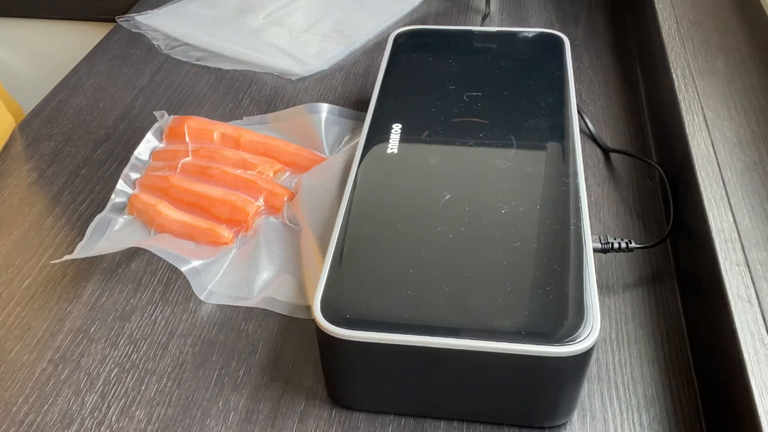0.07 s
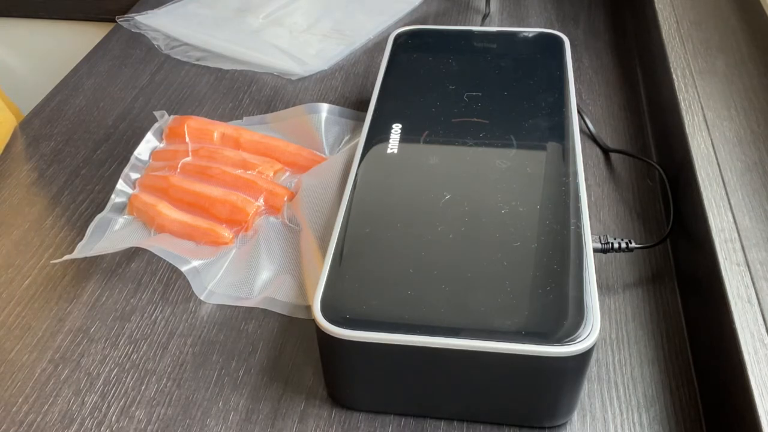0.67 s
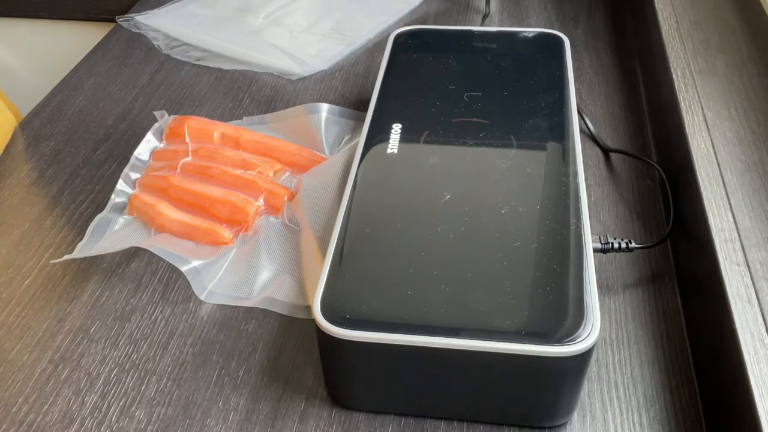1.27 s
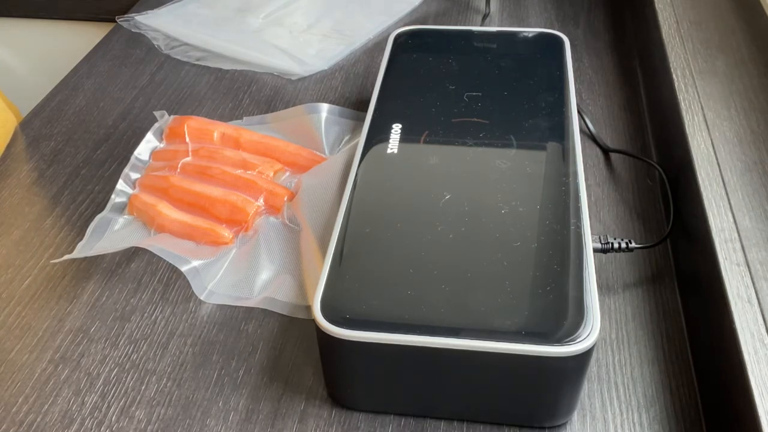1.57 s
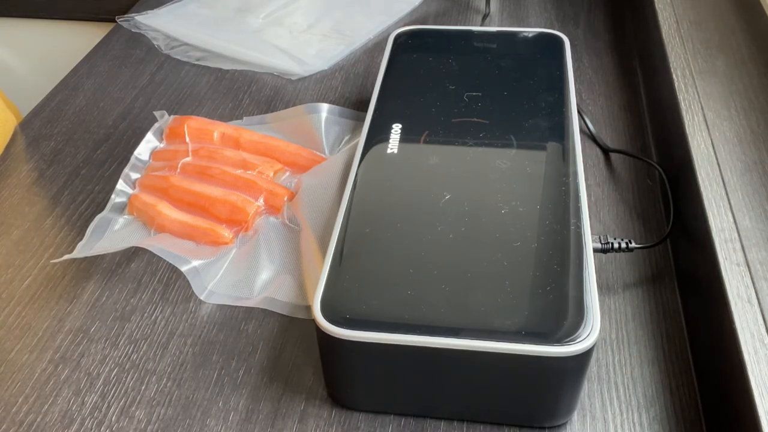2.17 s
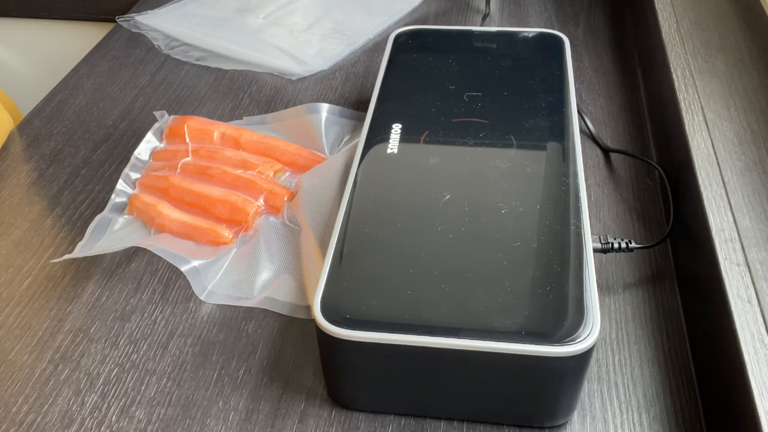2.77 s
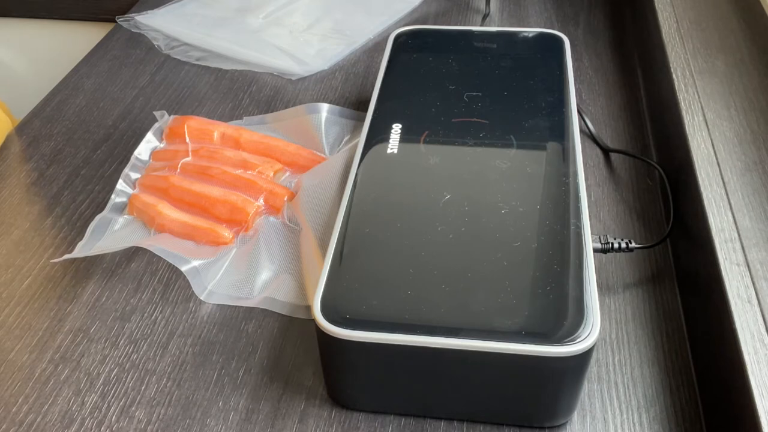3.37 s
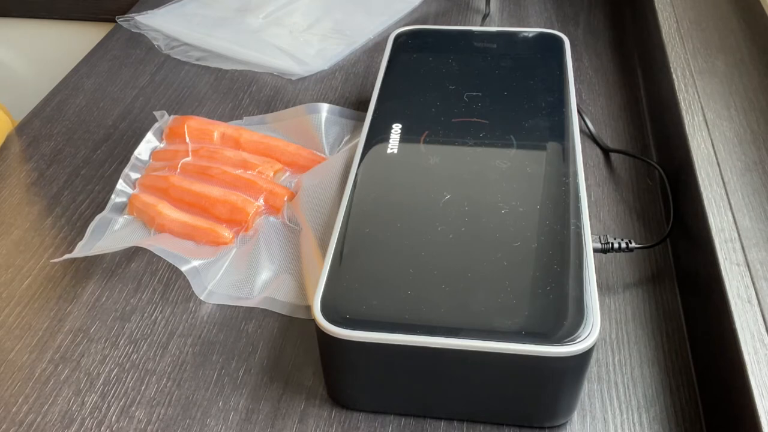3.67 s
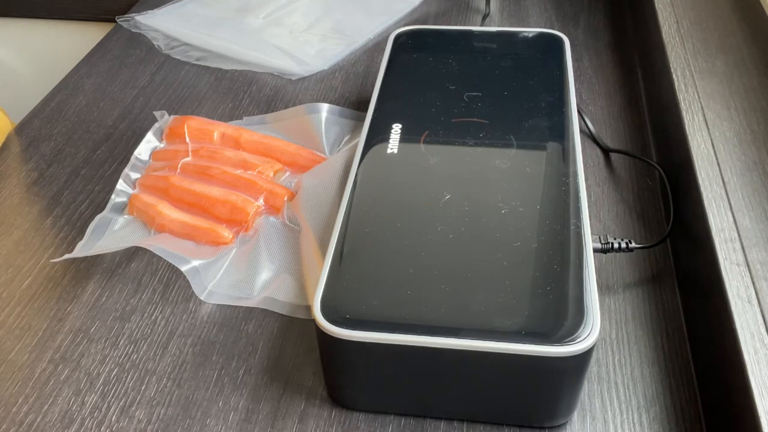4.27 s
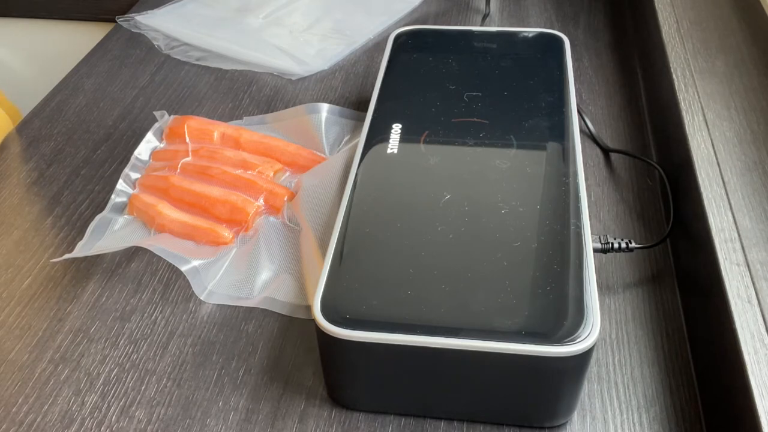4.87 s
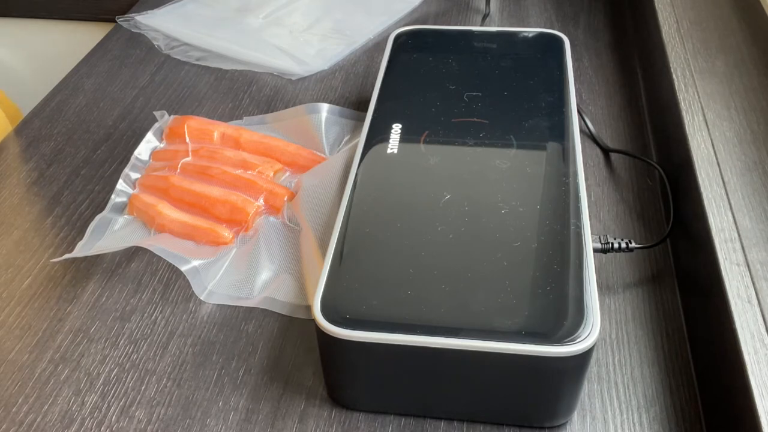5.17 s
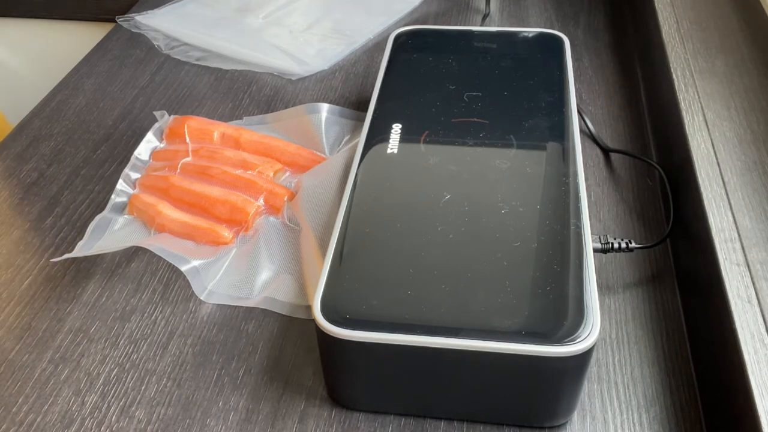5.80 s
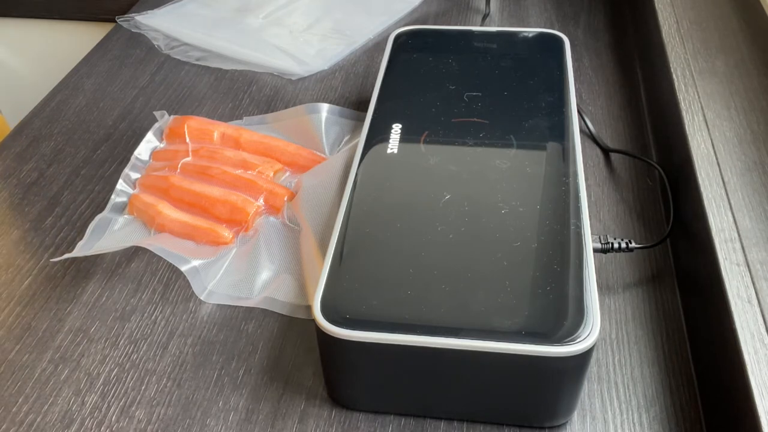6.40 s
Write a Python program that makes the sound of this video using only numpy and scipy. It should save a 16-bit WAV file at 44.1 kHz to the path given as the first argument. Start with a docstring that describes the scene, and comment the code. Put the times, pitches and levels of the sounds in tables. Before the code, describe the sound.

A vacuum sealer's small pump buzzes loudly close to the microphone for an instant, then switches off and winds down with a falling clatter and a short rattle. A quiet room remains, with low rumble and faint hiss. The plastic food bag rustles faintly as it settles, a few soft bumps sound on the wooden counter, and small ticks, tiny squeaks and a quick snap come later.

```python
"""A vacuum sealer finishes a bag

A vacuum sealer on a wooden counter pulls the last air from a food bag. Its diaphragm pump buzzes
under load, is switched off and coasts to rest with clattering valves, puffs of air and a last rattle.
Then the quiet room rumbles and hisses. Soft blows ring the counter, the plastic ticks and snaps,
and the bag rustles and squeaks as it settles."""
import sys
import numpy as np
from scipy import signal
from scipy.fft import rfft, irfft
from scipy.io import wavfile
from scipy.ndimage import uniform_filter1d

SR = 44100
rng = np.random.default_rng(int(sys.argv[2]) if len(sys.argv) > 2 else 0)


def generate_wav(sig):
    """Save sig (samples, or channels by samples) to the path in sys.argv[1] as 16-bit PCM at SR."""
    pcm = np.round(np.clip(np.atleast_2d(sig).T, -1, 1) * 32767).astype(np.int16)
    wavfile.write(sys.argv[1], SR, pcm)


N = 288414
TIME = np.arange(N) / SR


def from_db(db):
    """Turn decibels into a number to multiply by."""
    return 10 ** (np.asarray(db) / 20)


def rms_one(x):
    """Scale a sound so that its average power is 1."""
    return x / np.sqrt(np.mean(x ** 2) + 1e-20)


def cut(x, hz, order, keep="low"):
    """Keep the low or the high side of a sound; a higher order cuts more steeply."""
    return signal.sosfilt(signal.butter(order, hz, keep, fs=SR, output="sos"), x + 1e-18)


def db_at(colour, hz):
    """Read a level between the rows of a colour table, which says how strong each frequency is."""
    known_hz, db = np.transpose(colour)
    return np.interp(np.log(hz), np.log(known_hz), db)


def noise(colour):
    """Steady noise of power 1 in the given colour, falling steeply past both ends of the table."""
    hz = np.maximum(np.fft.rfftfreq(N, 1 / SR), 1)
    octaves_outside = np.abs(np.log2(hz / np.clip(hz, colour[0][0], colour[-1][0])))
    gain = from_db(db_at(colour, hz) - 74 * octaves_outside)
    return rms_one(irfft(rfft(rng.standard_normal(N)) * gain, N))


def resonate(x, hz, width_hz):
    """A resonance: it lets through the sound near one frequency."""
    r = np.exp(-np.pi * width_hz / SR)
    feedback = [1, -2 * r * np.cos(2 * np.pi * hz / SR), r * r]
    return signal.lfilter(np.array([1, 0, -1]) * (1 - r * r) / 2, feedback, x + 1e-18)


def ring(clicks, hz, fade_s):
    """Each click starts a tone that drops 60 dB in fade_s."""
    r, w = np.exp(-np.log(1000) / (fade_s * SR)), 2 * np.pi * hz / SR
    return signal.lfilter([0, np.sin(w)], [1, -2 * r * np.cos(w), r * r], clicks + 1e-18)


def since(start_s):
    """Seconds since the start, and 0 before it."""
    return np.maximum(TIME - start_s, 0)


def dying(start_s, fade_s):
    """Jump to 1, then die away. A fade time is the time it takes to drop 60 dB."""
    return (TIME >= start_s) * np.exp(-np.log(1000) * since(start_s) / fade_s)


def ramp(start_s, length_s):
    """Rise evenly from 0 to 1."""
    return np.clip((TIME - start_s) / length_s, 0, 1)


def drift(per_s):
    """Wander at random, mostly between -1 and 1."""
    points = rng.standard_normal(int(N / SR * per_s) + 2)
    return np.interp(TIME * per_s, np.arange(len(points)), points)


def room(x, echo_db, wall_hz=5000):
    """Add a smooth wash of echoes, dulled by the walls."""
    tail = (rng.standard_normal(N) * dying(start_s=0.0033, fade_s=0.4))[:SR]
    tail = cut(tail / np.linalg.norm(tail), wall_hz, order=1)
    return x + from_db(echo_db) * signal.fftconvolve(x, tail)[:N]


FULL_TURNS_PER_S, SWITCH_OFF_S = 196.9, 0.145


def motor_speed(drag_s=1.0, stop_s=0.585):
    """Share of full speed: steady until switched off, then slowed by drag until friction stalls it."""
    coast_s = stop_s - SWITCH_OFF_S
    coasted_s = np.minimum(since(SWITCH_OFF_S), coast_s)
    return np.maximum(1 - np.expm1(-coasted_s / drag_s) / np.expm1(-coast_s / drag_s), 0)


def pump_load(hold_s=0.019, release_s=0.025):
    """Share of full load, which lets go just after the switch."""
    return np.exp(-(since(SWITCH_OFF_S + hold_s) / release_s) ** 2)


def motor_tones(turns, rows):
    """Tones at whole multiples of the turning speed, made for the first second only."""
    out, angle = np.zeros(N), 2 * np.pi * turns[:SR]
    for multiple, db in rows:
        phase = rng.uniform(0, 2 * np.pi)
        out[:SR] += np.sqrt(2) * from_db(db) * np.sin(multiple * angle + phase)
    return out


# The tones that stand out of the buzz. Each row: multiple of the motor speed, relative level in dB.
BUZZ_TONES = [(1, -1), (2, -47.5), (3, -21.5), (4, -18), (5, -29), (6, -31.5), (7, -33.5), (9, -39),
              (12, -39), (17, -46), (19, -45.5), (20, -47), (29, -44), (39, -48), (42, -49)]
# The colours of the other buzz tones, the valve clatter and the rushing air.
# Each row: frequency in Hz, relative level in dB.
BUZZ_COLOUR = [(1600, -44), (2200, -42), (2600, -48), (3100, -44), (4300, -57), (5900, -53), (6700, -60.5),
               (7600, -55.5), (9500, -57), (10000, -75), (14000, -63)]
VALVE_COLOUR = [(130, 10), (220, 0), (330, 7), (400, -11), (560, 2), (800, -3), (1300, -3), (1900, -9.5),
                (2800, -10.5), (4200, -34.5), (5000, -55), (8000, -23.5)]
AIR_COLOUR = [(2000, 11), (3000, 5.5), (4200, 1.5), (5000, -5), (6800, -5.5), (7900, -6), (9500, -7.5),
              (10500, -40), (15000, -25.5)]


def loaded_pump(turns, level_db=-14.5, valve_db=-52, air_db=-50, uneven_db=2.5, flutter_db=1.0):
    """Fast, even strokes make a hum under a fluttering whine, which goes first when the power is cut."""
    levels = {k: db_at(BUZZ_COLOUR, k * FULL_TURNS_PER_S) + rng.normal(0, uneven_db)
              for k in range(1, 77)}
    levels.update(BUZZ_TONES)
    tones = list(levels.items())
    # The high tones flutter in six separate groups.
    whine = sum(motor_tones(turns, tones[7 + group::6]) * from_db(flutter_db * drift(per_s=45))
                for group in range(6))
    hum = motor_tones(turns, tones[:3])
    middle = motor_tones(turns, tones[3:7])
    driven = np.exp(-since(SWITCH_OFF_S) / 0.019)
    buzz = hum + driven * (middle + whine)
    rush = from_db(valve_db) * noise(VALVE_COLOUR) + from_db(air_db) * noise(AIR_COLOUR)
    return from_db(level_db) * pump_load() * (buzz + rush)


# The colour of the room's rumble. Each row: frequency in Hz, relative level in dB.
RUMBLE_COLOUR = [(25, -47), (33, -28), (40, -5.5), (48, 4), (56, 2.5), (65, 7.5), (92, -14.5), (110, -4.5),
                 (127, -11.5), (152, -1.5), (175, -8.5), (225, -8), (257, -18.5), (274, -11), (295, -22),
                 (342, -17.5), (400, -37)]
# How its deep and upper parts swell. Each row: time in seconds, change of level in dB.
DEEP_SWELLS = [(0.6, 4.5), (0.75, 0.5), (1.2, -2.5), (1.6, -0.5), (2.1, 3.5), (2.4, -2), (2.6, 5),
               (2.85, 2), (3.1, 0.5), (3.7, -2.5), (4.1, 2.5), (4.95, 2.5), (5.1, 0.5), (5.35, 2),
               (5.87, -1), (6.15, 2)]
UPPER_SWELLS = [(0.6, 1.5), (1.5, 0), (2.05, 0.5), (2.35, -3.5), (2.6, -1), (3.3, -1), (4.0, 0.5),
                (4.25, -0.5), (4.6, 1), (5.1, 2), (5.85, -2), (6.1, 1.5), (6.5, -1.5)]


def rumble(level_db=-55, split_hz=95, steady_s=0.26):
    """The building rumbles in the room's low resonances; the deep and upper parts swell separately."""
    out = 0
    for side, swells in (("low", DEEP_SWELLS), ("high", UPPER_SWELLS)):
        part = cut(noise(RUMBLE_COLOUR), split_hz, order=8, keep=side)
        steady = part / np.sqrt(uniform_filter1d(part ** 2, int(steady_s * SR)) + 1e-12)
        out += steady * from_db(level_db + np.interp(TIME, *np.transpose(swells)))
    return out


# The colour of the room's hiss. Each row: frequency in Hz, relative level in dB.
HISS_COLOUR = [(380, -2), (550, -3), (950, -0.5), (1250, -3), (1650, -3), (2250, -6), (2700, -1),
               (3750, -10.5), (4200, -6), (5200, -12.5), (6100, -6), (7200, -10), (8100, -5.5),
               (9000, -15.5), (10200, -25.5), (10800, -50)]
# The ringing in that hiss. Each row: frequency in Hz, width in Hz, relative level in dB.
HISS_RESONANCES = [(477, 20, 2), (721, 16, 1), (1095, 22, -1), (1423, 18, 4), (1507, 14, 1.5),
                   (1765, 25, -6), (2058, 50, 0), (2645, 40, -6), (2950, 60, -7), (3345, 40, -5),
                   (3490, 40, -7)]


def room_hiss(hiss_db=-71, ringing_db=-74, hiss_sway_db=1.16, ringing_sway_db=2):
    """A faint hiss that the walls colour; its resonances come and go."""
    air = noise(HISS_COLOUR)
    ringing = 0
    for hz, width_hz, db in HISS_RESONANCES:
        gain = from_db(db - db_at(HISS_COLOUR, hz) + ringing_sway_db * drift(per_s=9))
        ringing += gain * resonate(air, hz, width_hz)
    hiss_gain = from_db(hiss_db + hiss_sway_db * drift(per_s=7.8))
    hiss = room(noise(HISS_COLOUR), echo_db=-10, wall_hz=12200)
    return hiss_gain * rms_one(hiss) + from_db(ringing_db) * rms_one(ringing)


def lingering_hum(level_db=-26):
    """The room holds the hum at its old pitch while the motor slows."""
    hum = motor_tones(FULL_TURNS_PER_S * TIME, [(1, level_db)])
    return hum * (1 - pump_load()) * dying(SWITCH_OFF_S, fade_s=0.71)


def stutter(speed, slip_turns=0.045):
    """The turns by which the crank runs ahead or lags by chance, more so the slower it goes."""
    return slip_turns * (1 - speed) * drift(per_s=130)


# The resonances of the plastic case. Each row: frequency in Hz, width in Hz, boost in dB.
CASE_RESONANCES = [(293, 30, 4), (458, 16, 8), (557, 15, -2), (773, 68, 1.5), (950, 27, -3.5),
                   (1105, 28, -4.5), (1150, 67, -24.5), (1410, 330, -0.5), (2550, 84, 3.5)]


def through_case(x):
    """The plastic case passes on the sound near its own resonances."""
    return sum(from_db(db) * resonate(x, hz, width_hz) for hz, width_hz, db in CASE_RESONANCES)


# The tones of the shaking pump. Each row: multiple of the motor speed, relative level in dB.
SHAKE_TONES = [(1, -1.5), (2, 1.5), (3, 6.5), (4, 0), (5, -5), (6, 5), (7, 0.5), (8, -6.5), (9, -10.5),
               (10, -12.5)]


def shake(turns, wobble_db=2.8, direct_db=-8, lost_to_rattle=0.5):
    """The pump shakes its case; its wavering tones swell as they slide through the resonances."""
    tones = [motor_tones(turns, [row]) * from_db(wobble_db * drift(per_s=35)) for row in SHAKE_TONES]
    upper = sum(tones[2:]) * (1 - lost_to_rattle * rattle_onset())
    shaking = sum(tones[:2]) + from_db(direct_db) * upper + through_case(tones[1] + upper)
    shaking /= np.linalg.norm([from_db(db) for _, db in SHAKE_TONES])
    return cut(shaking, hz=75, order=2, keep="high")   # a small case gives off little deep bass


def valve_clatter(flaps, case_db=-5):
    """The flapping valves make pulses of noise, heard directly and through the case."""
    knocks = flaps * noise(VALVE_COLOUR)
    return rms_one(knocks + from_db(case_db) * rms_one(through_case(knocks)))


def air_puffs(flaps, speed, vent_db=-49.5, hold_s=0.059, fade_s=0.25, puff_db=-61.5):
    """Trapped air escapes at the switch, and the valves puff more weakly as the pump slows."""
    vent = from_db(vent_db) * np.exp(-np.log(1000) * since(SWITCH_OFF_S + hold_s) / fade_s)
    puffs = from_db(puff_db) * speed ** 0.68
    return np.hypot(vent, puffs) * flaps * noise(AIR_COLOUR)


def coasting_pump(turns, speed, shake_db=-27, clatter_db=-40.5):
    """The freed pump shakes, clatters and puffs, rocking hardest at the resonance of its mounts."""
    mount_hz, mount_width_hz, mount_db = 152.4, 4.8, 2.5
    rocking = from_db(mount_db / (1 + ((speed * FULL_TURNS_PER_S - mount_hz) / mount_width_hz) ** 2))
    loose = ramp(SWITCH_OFF_S, length_s=0.021)
    flaps = rms_one(np.exp(0.22 * np.cos(4 * np.pi * turns)))   # the valves flap twice a turn
    shaking = from_db(shake_db) * speed ** 1.1 * loose * shake(turns)
    clatter = from_db(clatter_db) * speed ** 1.3 * (1 - pump_load()) * valve_clatter(flaps)
    return rocking * (shaking + clatter) + loose * air_puffs(flaps, speed)


def rattle_onset():
    """How far the rattle has set in, from 0 to 1."""
    return ramp(start_s=0.275, length_s=0.06)


# The colour of the rattle's knocks. Each row: frequency in Hz, relative level in dB.
RATTLE_COLOUR = [(190, 15.5), (300, 5), (420, 0.5), (600, 4.5), (850, 0.5), (1300, -3.5), (1800, -23.5),
                 (2700, -29), (4200, -27)]


def rattle(turns, level_db=-41, case_db=-6, uneven_db=2, scatter_s=0.0012, knock_s=0.0069):
    """The slow pump knocks loosely against its case twice a turn, until friction stalls it."""
    strokes = np.flatnonzero(np.diff(np.floor(2 * turns)))
    lateness, strength = rng.standard_normal((SR, 2))[:len(strokes)].T
    hits = np.abs(strokes + lateness * scatter_s * SR).astype(int)
    clicks = np.zeros(N)
    clicks[hits] = from_db(uneven_db * strength)
    bursts = signal.lfilter([1], [1, -np.exp(-1 / (knock_s * SR))], clicks + 1e-18)
    knocks = cut(bursts * noise(RATTLE_COLOUR), hz=3000, order=4)
    fading = np.exp(-since(0.415) / 0.033)   # holds, then dies quickly
    return from_db(level_db) * rattle_onset() * fading * (knocks + from_db(case_db) * through_case(knocks))


# Soft scuffs. Each row: loudest moment in seconds, level in dB.
SCUFF_SWELLS = [(1.04, -69), (1.76, -68.5), (2.02, -70), (2.63, -87), (3.28, -71), (3.69, -72), (3.95, -68),
                (4.48, -69), (5.06, -66.5)]
# Their colour. Each row: frequency in Hz, relative level in dB.
SCUFF_COLOUR = [(330, -0.5), (480, -4), (650, -5.5), (900, -21)]


def scuffs(half_s=0.021):
    """Short, dull swells of rubbing just above the rumble."""
    peak_s, db = np.transpose(SCUFF_SWELLS)
    swells = np.exp(-0.5 * ((TIME - peak_s[:, None]) / half_s) ** 2)
    return (from_db(db) @ swells) * noise(SCUFF_COLOUR)


# The bag settling.
# Each row: loudest moment in seconds, half length in seconds, rub level in dB, crinkle level in dB.
BAG_RUSTLES = [(1.677, .03, -90, -73.5), (2.178, .03, -73.5, -92), (2.985, 0.072, -73, -79),
               (3.217, 0.034, -84, -80), (3.328, 0.018, -78, -73), (3.39, 0.027, -78, -81),
               (3.506, 0.063, -74, -81), (3.666, 0.02, -70.5, -74), (4.781, 0.035, -71, -66.5),
               (5.55, 0.033, -86, -80), (5.67, 0.05, -71, -83), (6.11, 0.022, -73, -73.5),
               (6.21, 0.021, -71, -80), (6.316, 0.023, -71, -73)]
# The colours of rubbing and of crinkling film. Each row: frequency in Hz, relative level in dB.
RUB_COLOUR = [(550, 6.5), (900, -1), (1500, -2), (2100, 0.5), (3000, -3), (4000, -5.5)]
CRINKLE_COLOUR = [(2800, -7), (4500, 2), (6500, 1.5), (9000, -7), (10500, -31)]


def rustles(grain_db=3, stir_db=-83, stir_sway_db=4):
    """The bag's film rubs and crinkles in brief, grainy swells and stirs faintly in between."""
    peak_s, half_s, rub_db, crinkle_db = np.transpose(BAG_RUSTLES)
    swells = np.exp(-0.5 * ((TIME - peak_s[:, None]) / half_s[:, None]) ** 2)
    stir = from_db(stir_db + stir_sway_db * drift(per_s=14))
    grains = from_db(grain_db * drift(per_s=400))
    return sum(np.hypot(from_db(db) @ swells, stir) * rms_one(noise(colour) * grains)
               for db, colour in ((rub_db, RUB_COLOUR), (crinkle_db, CRINKLE_COLOUR)))


# Ticks of the case and bag.
# Each row: start in seconds, level in dB, middle frequency in Hz, fade time in seconds.
PLASTIC_TICKS = [(1.987, -65.5, 880, 0.26), (3.075, -67.5, 1010, 0.28), (3.244, -64, 940, .08),
                 (3.675, -61, 1150, 0.15), (5.304, -69.5, 3960, 0.41), (5.846, -64.5, 3300, 0.18)]


def ticks(relative_width=0.65):
    """Each tick is a short burst of noise in one broad resonance of the plastic."""
    out = np.zeros(N)
    for start_s, db, hz, fade_s in PLASTIC_TICKS:
        band = resonate(rng.standard_normal(N), hz, relative_width * hz)
        band = resonate(band, hz, 2 * relative_width * hz)
        out += from_db(db) * dying(start_s, fade_s) * rms_one(band)
    return cut(out, hz=9000, order=8)


# Dull blows on the counter. Each row: start in seconds, strength in dB, brightness in Hz.
COUNTER_BLOWS = [(2.836, -39, 377), (2.848, -38.5, 378), (2.867, -44, 380), (2.889, -40.5, 380),
                 (2.946, -46, 520), (2.96, -34, 430), (2.977, -38.5, 430), (3.01, -44.5, 600),
                 (3.048, -40.5, 320), (5.046, -44.5, 480)]
# The wood's own tones. Each row: frequency in Hz, relative level in dB, fade time in seconds.
COUNTER_TONES = [(146, 7, 0.13), (193, -14, 0.044), (231, 6, 0.056), (269, -6, 0.054), (328, 3, 0.07),
                 (417, -9, 0.039), (495, -9, 0.065), (590, -7, 0.073), (680, -10, 0.05)]


def bumps():
    """Soft blows ring the counter; the softer the contact, the rounder the knock."""
    blows = 0
    for start_s, db, brightness_hz in COUNTER_BLOWS:
        click = from_db(db) * signal.unit_impulse(N, round(start_s * SR))
        blows += cut(click, brightness_hz, order=3)
    # Every other pair of tones starts by swinging the opposite way.
    wood = sum((-1) ** (k // 2) * from_db(db) * ring(blows, hz, fade_s)
               for k, (hz, db, fade_s) in enumerate(COUNTER_TONES))
    return wood / np.sqrt(len(COUNTER_TONES))


# Squeaks of the bag. Each row: start in seconds, level in dB, first pitch in Hz, pitch it nears in Hz.
BAG_SQUEAKS = [(5.042, -57.5, 1400, 740), (5.307, -69, 4600, 3950), (6.277, -69, 4750, 4350)]


def squeaks(rise_s=0.0029, length_s=0.022, fall_s=0.009):
    """The film slips with brief tones that drop in pitch as it goes slack."""
    out = np.zeros(N)
    for start_s, db, first_hz, low_hz in BAG_SQUEAKS:
        hz = low_hz + (first_hz - low_hz) * np.exp(-since(start_s) / fall_s)
        loudness = from_db(db) * ramp(start_s, rise_s) * np.sqrt(1 - ramp(start_s, length_s))
        out += loudness * np.sin(2 * np.pi * np.cumsum(hz) / SR)
    return out


# A quick run of snaps. Each row: start in seconds, crack level in dB, ring level in dB.
PLASTIC_SNAPS = [(5.843, -52.5, -63), (5.8485, -55.5, -62), (5.8525, -61, -65), (5.861, -63, -76),
                 (5.869, -62, -78)]
# The plastic's own tones. Each row: frequency in Hz, relative level in dB, fade time in seconds.
PLASTIC_TONES = [(458, -3, .08), (680, -4, 0.033), (900, 2, 0.039), (1110, 1, .05), (1490, 2, .015),
                 (3004, -9, .03)]
# The colour of a crack. Each row: frequency in Hz, relative level in dB.
CRACK_COLOUR = [(600, 4), (2000, 1), (3500, -9), (6000, -5), (8500, -5), (10000, -20)]


def snaps():
    """Each contact is a dry, broad crack that leaves the plastic ringing briefly."""
    clicks, cracks = np.zeros(N), np.zeros(N)
    for start_s, crack_db, ring_db in PLASTIC_SNAPS:
        clicks[round(start_s * SR)] += from_db(ring_db)
        cracks += from_db(crack_db) * dying(start_s, fade_s=0.0091)
    ringing = sum(from_db(db) * ring(clicks, hz, fade_s) for hz, db, fade_s in PLASTIC_TONES)
    return cracks * noise(CRACK_COLOUR) + ringing


def scene():
    """The pump close by, then the small sounds of the quiet room."""
    speed = motor_speed()
    turns = FULL_TURNS_PER_S * np.cumsum(speed) / SR
    pump = loaded_pump(turns) + lingering_hum()
    pump += room(coasting_pump(turns + stutter(speed), speed), echo_db=-9)
    pump += room(rattle(turns), echo_db=-5)
    counter = room(bumps(), echo_db=-7)
    small_sounds = room(ticks() + snaps() + scuffs() + rustles() + squeaks(), echo_db=-4.5)
    return (pump + counter + small_sounds + rumble() + room_hiss())[None]


def record(dry):
    """Cut away the very highest treble."""
    return signal.sosfilt(signal.cheby2(12, 70, 16000, fs=SR, output="sos"), dry)


dry = scene()
out = record(dry)
generate_wav(out)
```